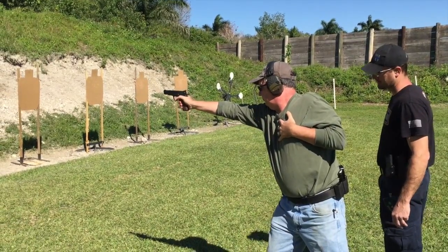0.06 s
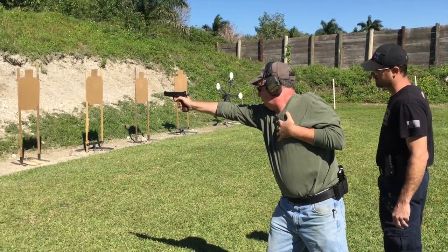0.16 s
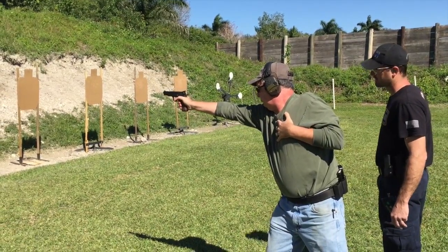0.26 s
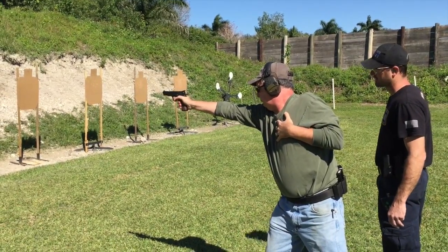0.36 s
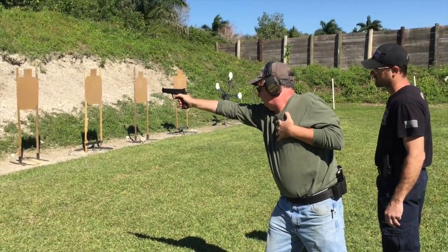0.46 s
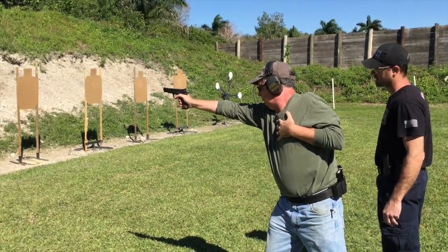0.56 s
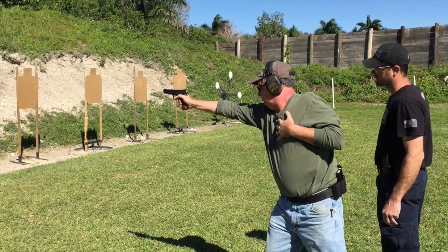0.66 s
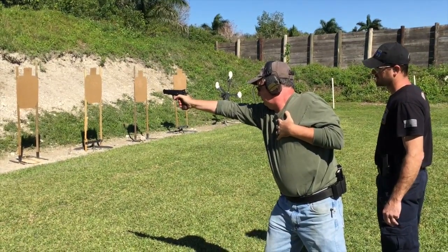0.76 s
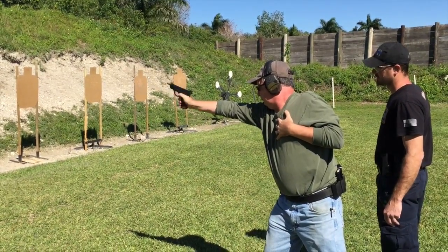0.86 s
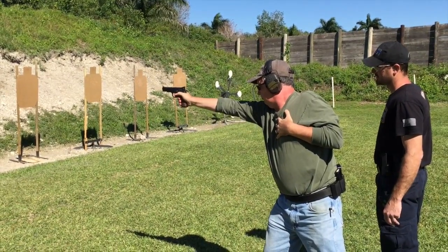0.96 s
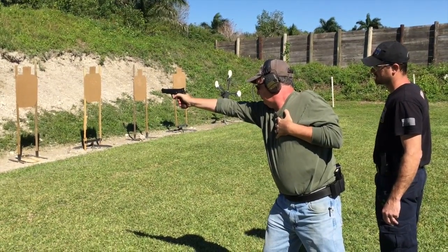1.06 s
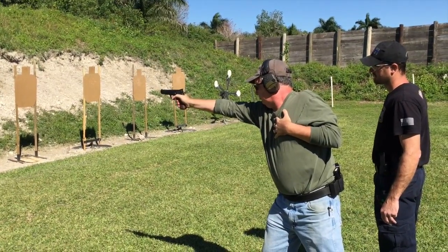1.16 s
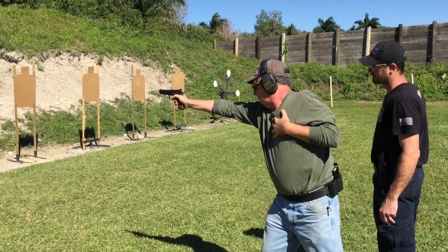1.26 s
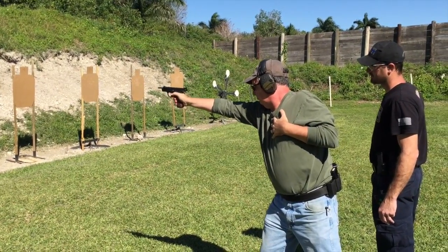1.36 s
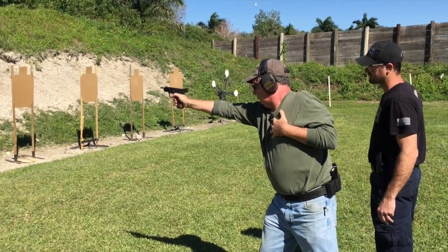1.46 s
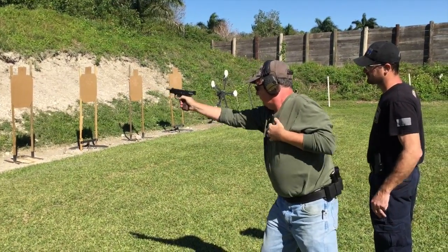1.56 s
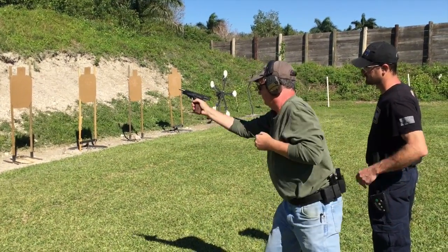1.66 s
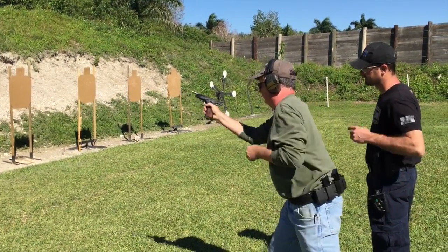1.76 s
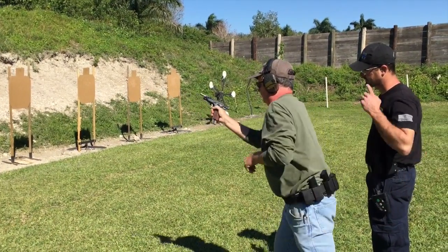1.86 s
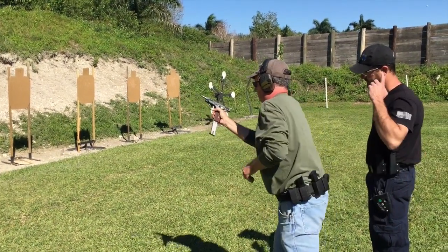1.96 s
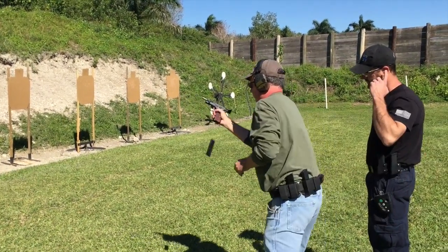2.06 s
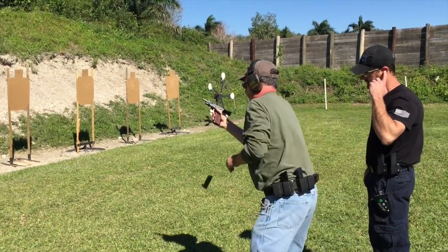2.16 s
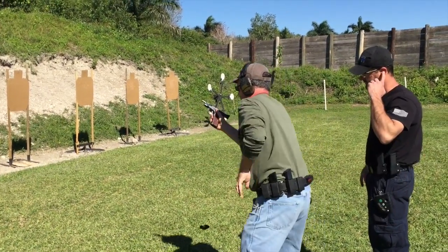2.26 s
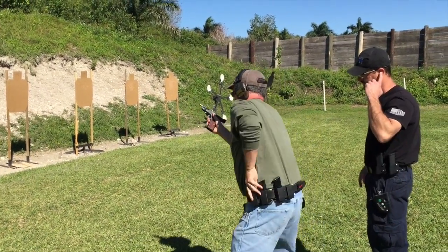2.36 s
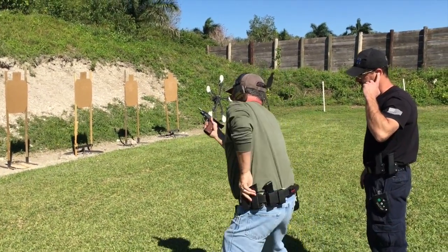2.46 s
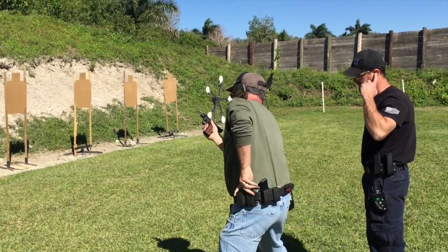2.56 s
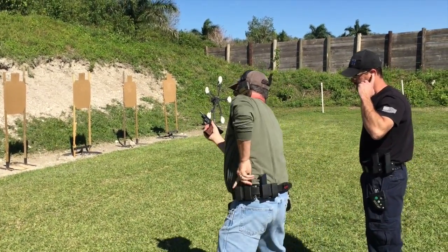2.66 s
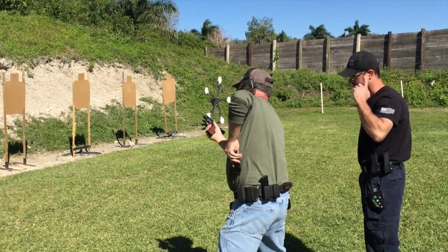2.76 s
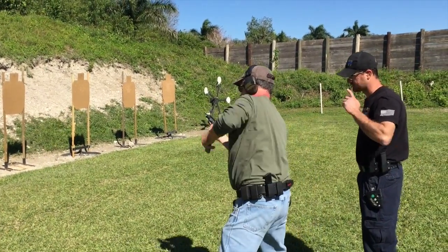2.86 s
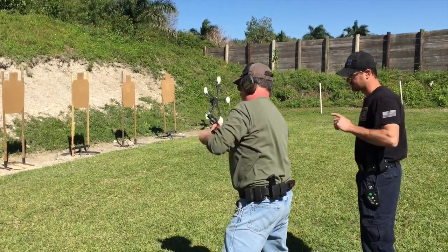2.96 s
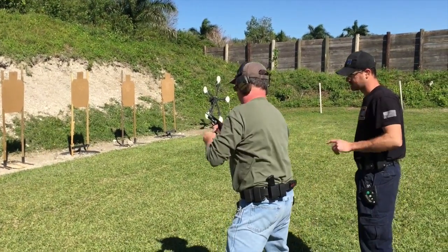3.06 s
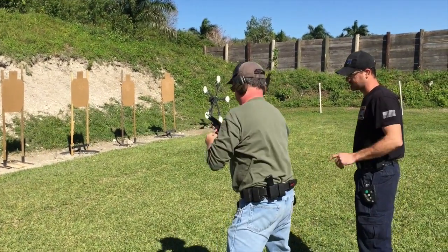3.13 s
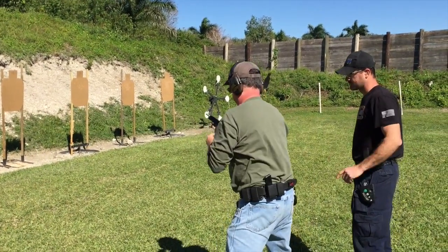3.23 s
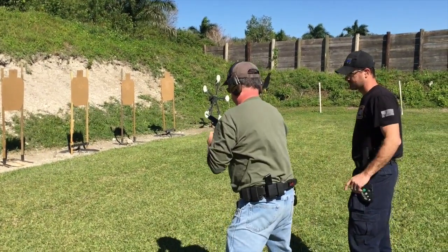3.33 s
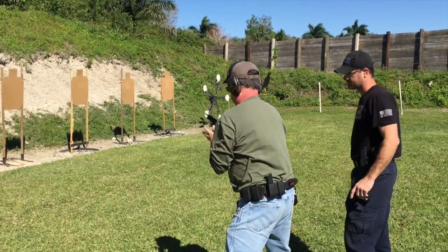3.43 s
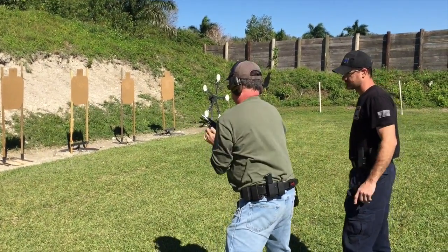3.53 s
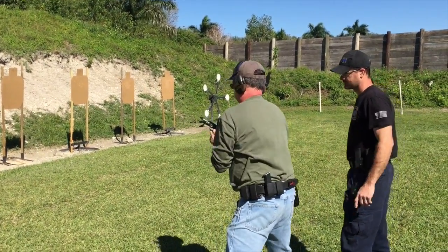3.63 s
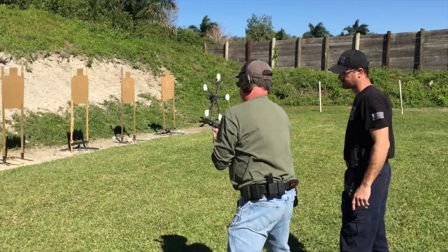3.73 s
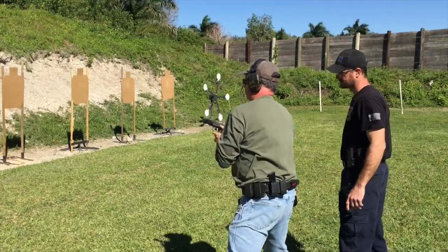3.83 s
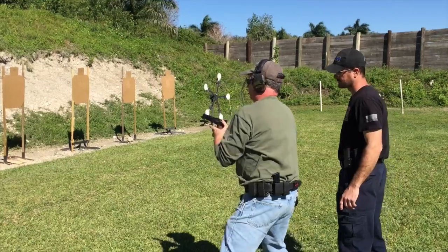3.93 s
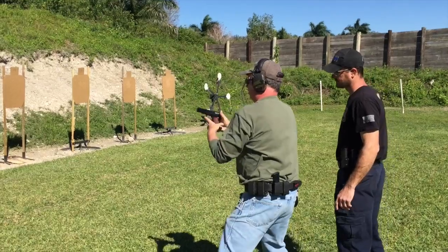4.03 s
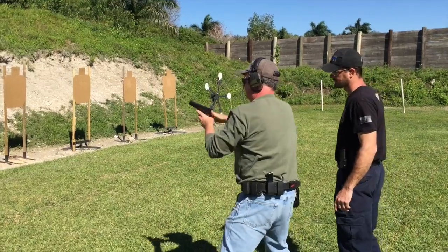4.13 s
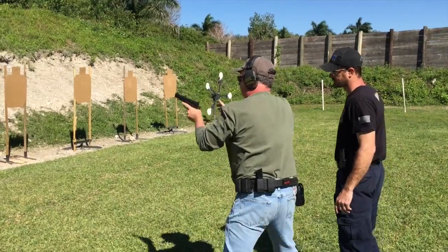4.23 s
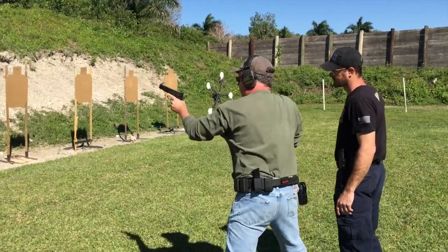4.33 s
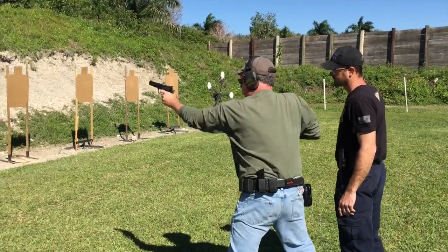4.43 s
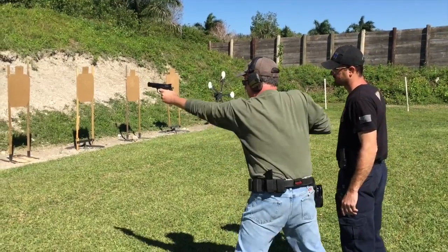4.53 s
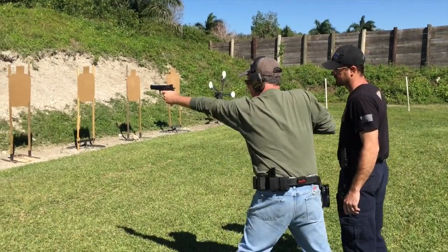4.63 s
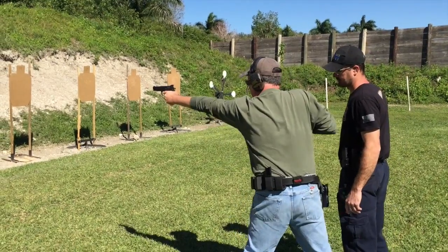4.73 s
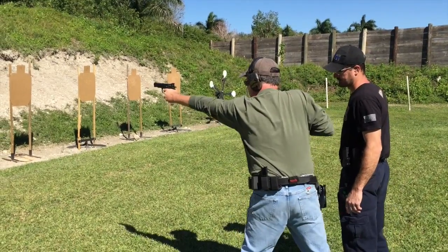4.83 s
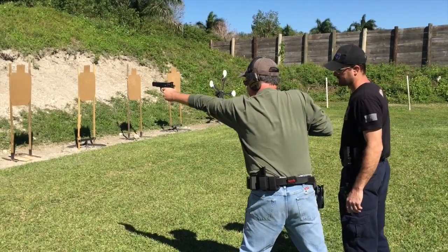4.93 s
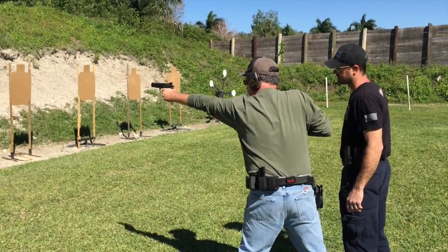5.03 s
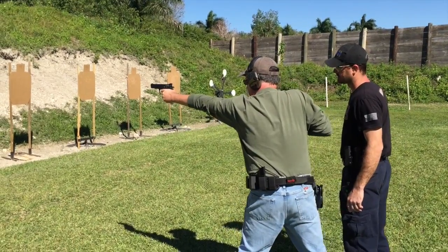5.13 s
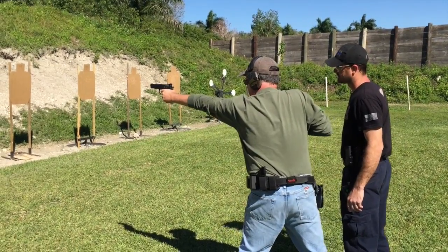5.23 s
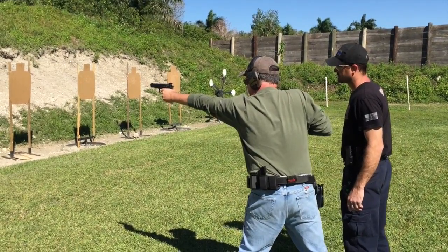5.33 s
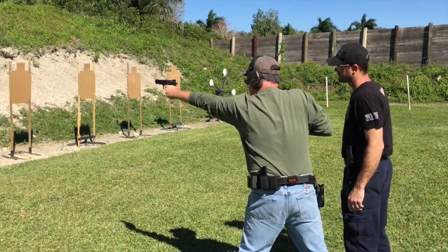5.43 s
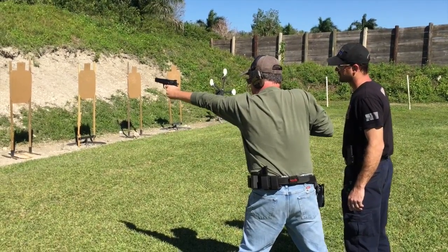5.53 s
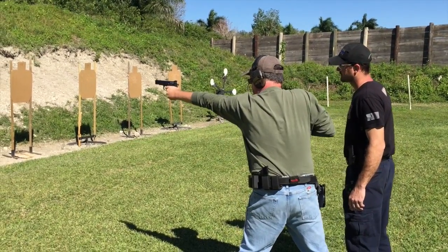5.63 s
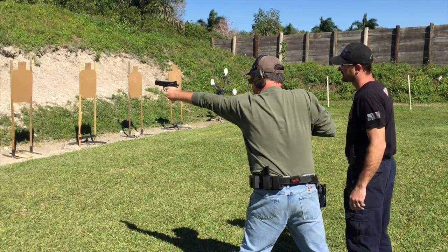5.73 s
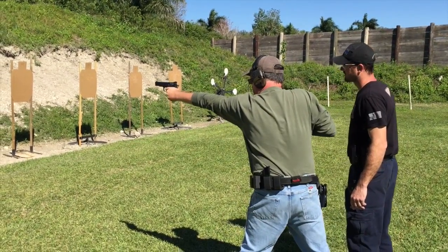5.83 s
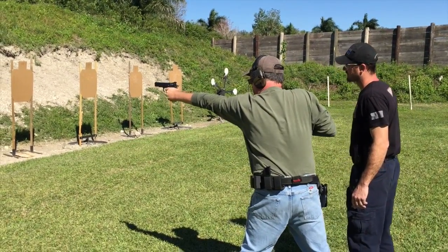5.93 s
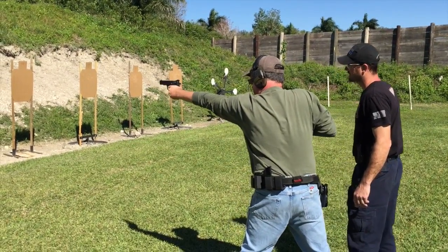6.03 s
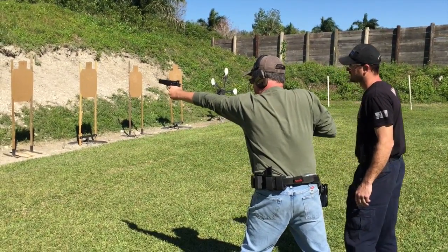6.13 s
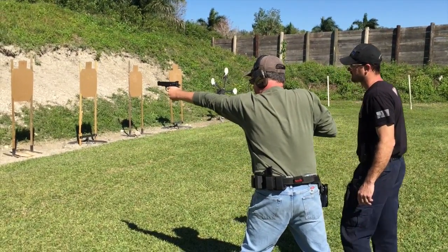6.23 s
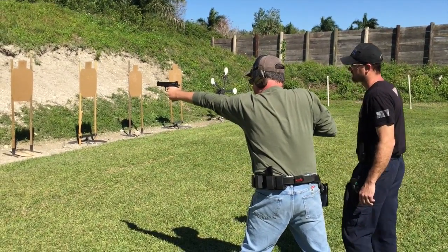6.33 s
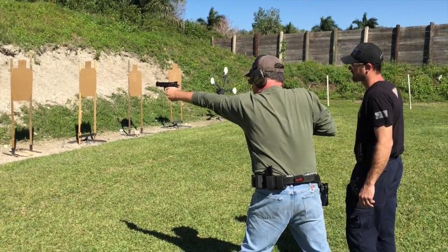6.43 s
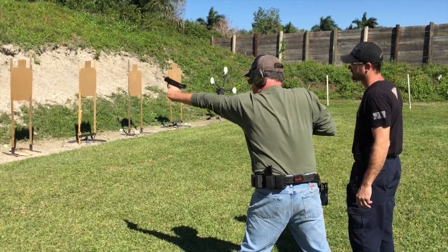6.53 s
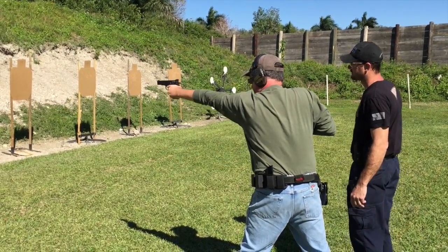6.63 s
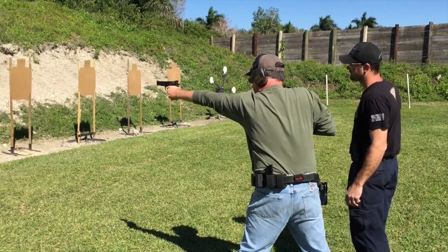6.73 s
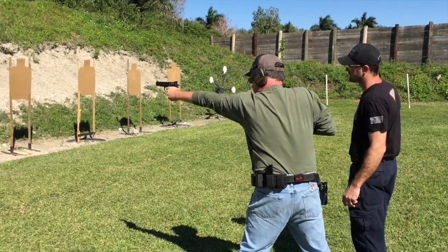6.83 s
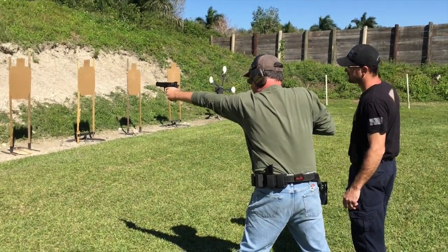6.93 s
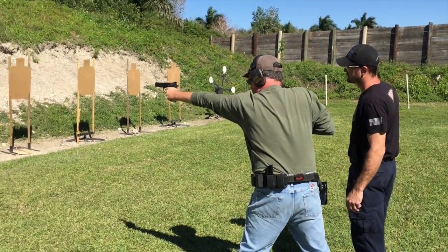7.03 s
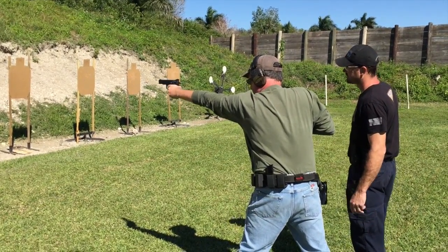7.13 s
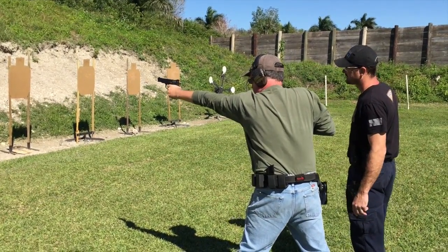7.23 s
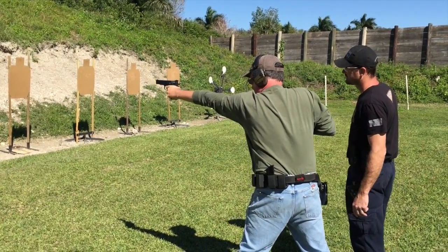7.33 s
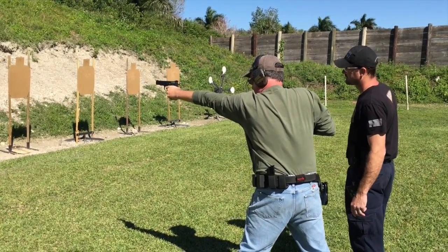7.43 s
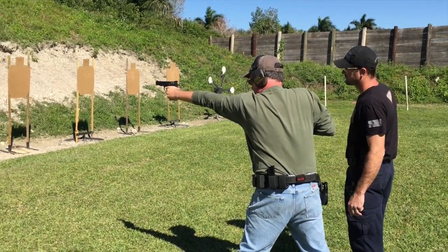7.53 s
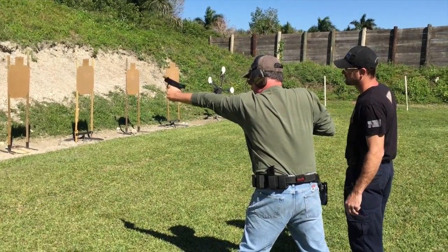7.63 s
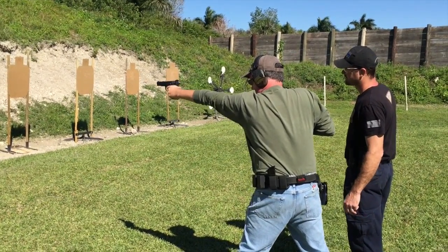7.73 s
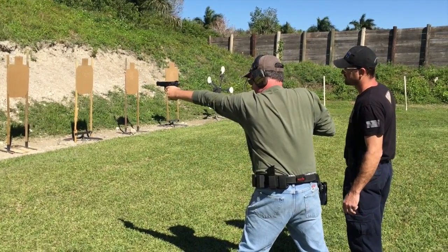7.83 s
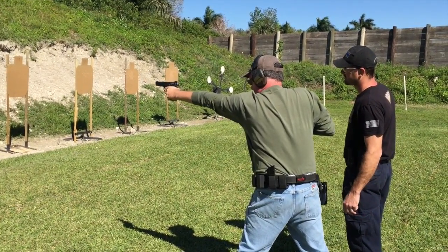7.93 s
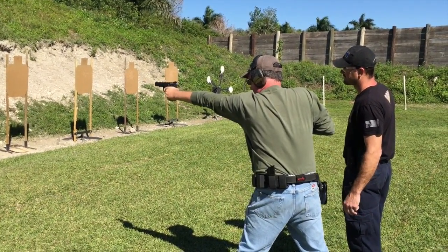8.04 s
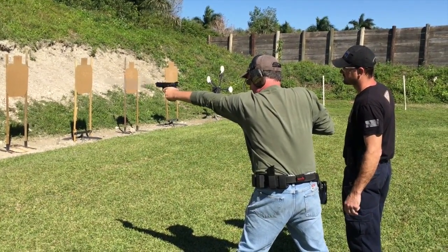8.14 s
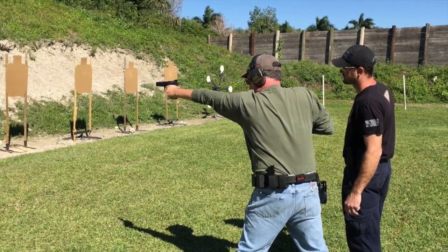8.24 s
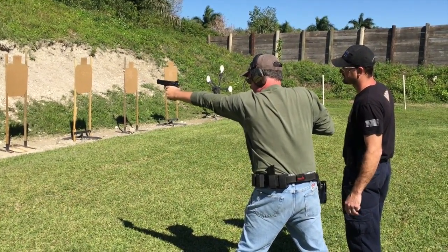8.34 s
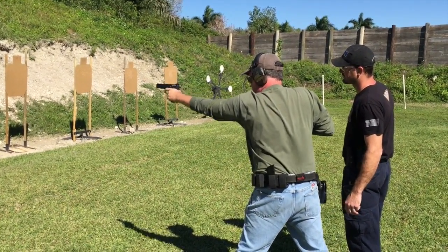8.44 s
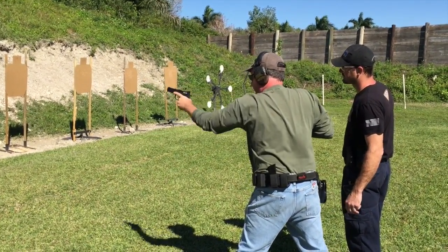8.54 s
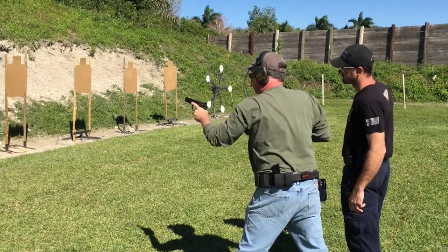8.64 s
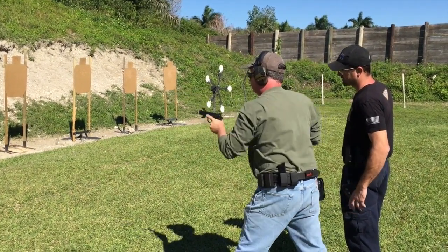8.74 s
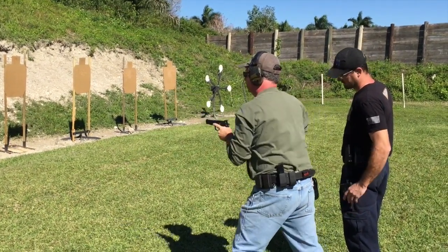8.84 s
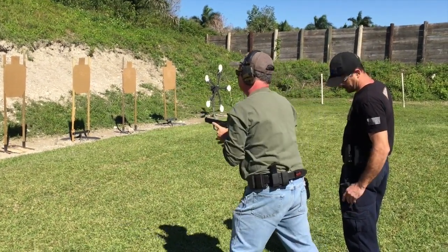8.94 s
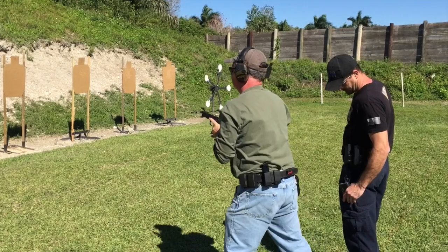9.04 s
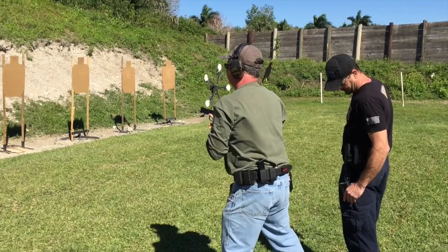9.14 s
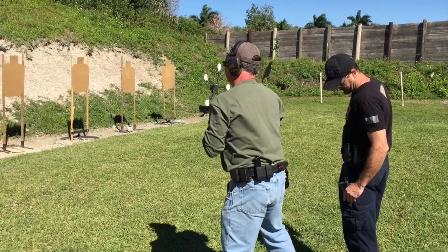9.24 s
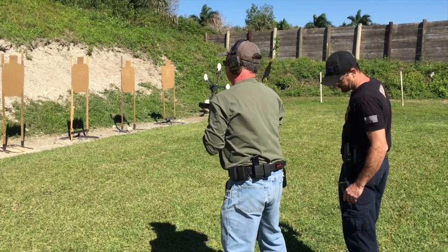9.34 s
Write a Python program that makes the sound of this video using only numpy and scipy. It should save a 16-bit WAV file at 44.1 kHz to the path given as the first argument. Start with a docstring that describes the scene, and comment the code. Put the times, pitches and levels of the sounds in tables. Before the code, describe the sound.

Four loud, overloaded handgun shots, a quick clattering magazine change and slide slam, then wind buffets and six more shots with rolling open-air echoes.

```python
"""Pistol practice on a grassy range

A pistol fires four shots, is reloaded, and fires six more outdoors. Each blast is noise and damped modes
that overload the microphone; an earth berm, a timber wall and the far country return it as noise and pulses.
Between the strings magazine and slide clack as struck resonators, clothes rustle as grainy noise,
a hand thumps softly, and wind buffets the microphone as low-passed turbulence."""
import sys
import numpy as np
from scipy import signal
from scipy.fft import rfft, irfft, next_fast_len
from scipy.io import wavfile

SR = 44100
rng = np.random.default_rng(int(sys.argv[2]) if len(sys.argv) > 2 else 0)


def materialize(psi):
    """Save the field psi as 16-bit PCM at rate SR to the path in sys.argv[1].

    A 1-D psi becomes a single channel; in a 2-D psi each row is a channel.
    """
    bounded = np.clip(np.atleast_2d(psi).T, -1, 1)
    quanta = np.round(bounded * 32767).astype(np.int16)
    wavfile.write(sys.argv[1], SR, quanta)


N = 414099
TIME = np.arange(N) / SR

# Noise spectrum of the muzzle crack, shared by the blast and its early returns:
# (frequency [Hz], relative density [dB per Hz])
CRACK_SPECTRUM = [(80, -15), (250, -0.5), (700, 2.5), (1500, 0.5), (2400, -6), (4000, -3.5), (7000, -8.5),
                  (10000, -13.5), (16000, -16.5)]


def from_db(db):
    """Level to amplitude: 20 dB is a factor of ten."""
    return 10 ** (np.asarray(db) / 20)


def noise(spectrum, size, tilt_db=0):
    """Spectral shaping: white noise filtered to a spectrum, scaled to an expected rms of 1 over its full length."""
    hz, db = np.transpose(spectrum)
    length = next_fast_len(max(size, 8192))
    octave = np.log2(np.maximum(np.arange(length // 2 + 1) * SR / length, 1))
    level_db = np.interp(octave, np.log2(hz), db)
    level_db = level_db + tilt_db * np.maximum(octave - 10, 0)  # tilt in dB per octave above 1024 Hz
    gain = from_db(level_db)
    gain *= 1 - np.exp(-(2 ** octave / 20) ** 2)  # fades out below about 20 Hz
    shaped = irfft(rfft(rng.standard_normal(length)) * gain, length)
    return shaped[:size] / np.sqrt(np.mean(gain ** 2))


def low_pass(x, hz, order=2):
    """Maximally flat (Butterworth) low-pass filtering."""
    return signal.sosfilt(signal.butter(order, min(hz, .45 * SR), fs=SR, output="sos"), x)


def resonate(x, hz, q):
    """Selective resonance: one peak filter, its output restored to the input energy."""
    y = signal.lfilter(*signal.iirpeak(min(hz, .45 * SR), max(q, 1), fs=SR), x)
    return y * np.linalg.norm(x) / np.linalg.norm(y)


def lumps(size, rate_hz, depth_db):
    """Random amplitude modulation: a slowly wandering gain of rms 1."""
    settle = SR // 4  # the filter's start is discarded
    slow = low_pass(rng.standard_normal(size + settle), rate_hz)[settle:]
    gain = from_db(depth_db * np.clip(slow / slow.std(), -2, 2))
    return gain / np.sqrt(np.mean(gain ** 2))


def burst(spectrum, t60, rise, tilt_db=0):
    """Reverberant decay: noise with an exponential rise [s] and a 60 dB fall in t60 [s]."""
    t = TIME[:int(2 * t60 * SR) + 1]
    return noise(spectrum, len(t), tilt_db) * (1 - np.exp(-t / rise)) * from_db(-60 * t / t60)


def ring(modes, spread_db):
    """Modal superposition: damped sines of alternating sign, their levels varied at random."""
    t = TIME[:SR // 3]
    out = np.zeros(len(t))
    for k, (hz, db, t60) in enumerate(modes):
        envelope = from_db(db + rng.normal(0, spread_db) - 60 * t / t60)
        out += (-1) ** k * envelope * np.sin(2 * np.pi * hz * t)
    return out


def pressure_pulse(hz):
    """Bipolar pulse: a Gaussian derivative of peak 1, its spectrum strongest at the given frequency."""
    phase = 2 * np.pi * hz * TIME[:SR // 10] - np.pi
    return -phase * np.exp((1 - phase ** 2) / 2)


def hump(t, s, half):
    """Gaussian envelope of height 1 centred on time s, down to 1/e after one half length."""
    return np.exp(-((t - s) / half) ** 2)


def swell(sound, s, half):
    """Amplitude windowing: a sound under a Gaussian hump, cut off three half lengths out."""
    out = np.zeros(N)
    near = slice(max(int((s - 3 * half) * SR), 0), int((s + 3 * half) * SR))
    out[near] = sound[near] * hump(TIME[near], s, half)
    return out


def add(out, s, sound):
    """Linear superposition: mix a sound in from time s [s]."""
    start = int(round(s * SR))
    out[start:start + len(sound)] += sound[:max(len(out) - start, 0)]


def open_air():
    """Ambient noise: a steady, mostly low and middle hush of the quiet open air."""
    # hush of the open air: (frequency [Hz], relative density [dB per Hz])
    air_spectrum = [(30, -14), (200, 2.5), (500, -2), (1700, -5.5), (3000, -12), (8000, -20), (16000, -22)]
    return from_db(-70.5) * noise(air_spectrum, N)


def wind_and_thump():
    """Turbulent pressure at the microphone: puffs reach higher in stronger wind; a hand thump is made alike."""
    # rumble of the wind: (frequency [Hz], relative density [dB per Hz])
    rumble_spectrum = [(20, -21.5), (40, -2.5), (70, 3), (150, -5), (260, -15), (500, -34), (1500, -62)]
    # gusts that swell and sink: (middle [s], half length [s], level [dB])
    gusts = [(2.45, 0.46, -56.5), (3.4, 0.3, -57), (4.35, 0.54, -51), (5.426, 0.29, -34.5),
             (5.85, .2, -37.5), (7.098, .9, -56.5), (9.049, 0.28, -54)]
    # single low puffs, wind buffets and at 3.706 s a hand thump:
    # (middle [s], half length [s], rms level over one half length [dB])
    puffs = [(3.706, 0.014, -42), (4.90, .012, -35.5), (5.111, .009, -31), (5.217, 0.013, -30),
             (5.268, 0.015, -29), (5.36, 0.021, -22), (5.431, 0.02, -24), (5.951, 0.005, -28.5),
             (9.29, 0.012, -37.5)]
    calm_db = -66  # level between gusts
    top_edge_hz, halving_db = 480, 16.5  # puff edge at the strongest wind; it halves per so many dB of lull

    gust_strengths = [from_db(db) * hump(TIME, s, half) for s, half, db in gusts]
    strength = np.hypot(np.linalg.norm(gust_strengths, axis=0), from_db(calm_db))
    out = noise(rumble_spectrum, N) * strength * lumps(N, rate_hz=14, depth_db=2.5)
    eddies = noise([(20, -18), (70, -3), (300, -8.0), (1500, -10.5)], N)
    for s, half, db in puffs:
        lull_db = 20 * np.log10(strength.max() / strength[int(s * SR)])
        edge_hz = top_edge_hz / 2 ** (lull_db / halving_db)
        puff = swell(low_pass(eddies, edge_hz, order=4), s, half)
        out += from_db(db) * puff * np.sqrt(half * SR / np.sum(puff ** 2))
    return out


def soft_swells():
    """Modulated, resonant noise: rubbing cloth and two far echoes as grainy pitched scuffs with a bright hiss."""
    # mid-pitched part of a swell: (frequency [Hz], relative density [dB per Hz])
    scuff_spectrum = [(200, 4), (700, 17), (1500, -5.5), (2100, 1.5), (3000, -21), (8000, -26)]
    # bright part of a swell: (frequency [Hz], relative density [dB per Hz])
    hiss_spectrum = [(500, -5), (2000, -0.5), (4500, 2.5), (6500, -2), (8000, -5.5), (10000, -5.5),
                     (16000, -8)]
    # soft mid-pitched swells: hands and clothes rubbing, and at 2.413 and 9.257 s the far echo of the
    # last shot: (middle [s], half length [s], relative scuff level [dB], hiss level [dB])
    swells = [(2.07, 0.02, -51.5, -55.5), (2.413, 0.052, -49, -58.5), (2.809, 0.046, -51, -69.5),
              (2.99, 0.048, -61, -74), (3.187, 0.045, -50, -71), (3.247, .028, -54.5, -55.5),
              (3.469, 0.015, -53.5, -58.5), (3.615, 0.071, -68, -58.5), (4.25, 0.094, -64, -69),
              (4.6, .08, -67, -69.5), (4.73, .035, -55, -61), (4.794, 0.026, -50.5, -57.5),
              (9.257, 0.13, -55.5, -78)]
    scuff_hz = 1580

    scuff = noise(scuff_spectrum, N) * lumps(N, rate_hz=110, depth_db=3.0)
    hiss = noise(hiss_spectrum, N) * lumps(N, rate_hz=78, depth_db=3.0)
    resonant = resonate(resonate(scuff, scuff_hz, q=2.2), scuff_hz, q=2.2)
    pitched = resonant + from_db(-7) * scuff
    out = np.zeros(N)
    for s, half, scuff_db, hiss_db in swells:
        out += swell(from_db(scuff_db - 0.5) * pitched + from_db(hiss_db) * hiss, s, half)
    return out


def field_echo(x, t60, echo_db):
    """Diffuse reverberation: noise follows the smoothed energy of a sound and dies away with it."""
    # returns of the open field: (frequency [Hz], relative density [dB per Hz])
    field_spectrum = [(200, -26.5), (700, -8.5), (1400, 2.5), (2600, -4), (4000, -10.5), (8000, -22.5),
                      (9700, -17), (16000, -33.5)]
    keep = from_db(-120 / (t60 * SR))  # energy kept per sample, a millionth after t60
    energy = signal.lfilter([1 - keep], [1, -keep], x ** 2 + 1e-18)
    wash = noise(field_spectrum, N) * lumps(N, rate_hz=35, depth_db=1.6)
    return from_db(echo_db) * np.sqrt(energy) * wash


def reload():
    """Impact excitation of modes: magazine drawn and seated, slide slammed home; the field answers softly."""
    # knock of steel on steel: (frequency [Hz], relative density [dB per Hz])
    steel_spectrum = [(150, -12.5), (500, -14), (1100, 5), (2000, 4.5), (3000, 3), (5000, 7.5), (6800, 5),
                      (7700, -4), (9600, 5), (13000, -1.5), (16000, -9)]
    # steel parts knocking: (time [s], relative level [dB], t60 [s], treble tilt [dB per octave],
    # pitch of the struck part [Hz])
    clacks = [(2.5198, -26.5, 0.042, 4, 4860), (2.5231, -12, .016, 6.5, 13400),
              (2.5384, -33, 0.053, 7, 5500), (2.761, -42, .024, -17, 1100),
              (2.8414, -35, 0.027, -9.5, 1490), (3.051, -56, .02, -5, 3500), (3.1217, -44, .05, -8, 1300),
              (3.13, -39, .024, 11, 2200), (3.1728, -38, .05, 7, 2040), (3.1894, -35.5, 0.045, -6, 1770),
              (3.468, -45, .04, -6, 1020), (3.5795, -20.5, .036, -0.5, 1820),
              (3.588, -38.5, 0.071, 1.5, 3110), (3.81, -31, .05, 2, 4925), (3.829, -25, .08, 1, 6780),
              (3.8387, -8, .046, 5.5, 9620), (3.8433, -19.5, .055, -6, 1250), (4.164, -55, 0.041, 3, 4470),
              (4.29, -47, .03, -4, 3970), (4.354, -50, 0.048, -4, 4240)]
    # ringing of slide and magazine: (frequency [Hz], relative level [dB], t60 [s])
    gun_modes = [(3250, -21, 0.13), (5060, -14, 0.033), (5980, -12.5, .035), (6700, -17.5, 0.068),
                 (8970, -11.5, 0.061), (9650, -22.5, 0.18), (10300, -21, .05), (12950, -12, .035),
                 (14660, -23.5, .04)]

    out = np.zeros(N)
    for s, db, t60, tilt_db, hz in clacks:
        knock = burst(steel_spectrum, t60, rise=0.00013, tilt_db=tilt_db)
        knock = knock * lumps(len(knock), rate_hz=620, depth_db=2.5)  # the parts chatter as they meet
        add(out, s, from_db(db - 2.5) * knock + from_db(db - 9) * resonate(knock, hz, q=17))
        ring_db = db - 7 + 1.5 * min(tilt_db, 1)  # dull knocks ring less
        add(out, s, from_db(ring_db) * ring(gun_modes, spread_db=3.0))
    return out + field_echo(out, t60=0.75, echo_db=-17.5)


def far_roll(air_loss_db=4.5):
    """Air absorption: lumpy far echoes lose treble, in dB per kHz and second of travel."""
    # echo of trees and banks: (frequency [Hz], relative density [dB per Hz])
    country_spectrum = [(60, -9), (200, 1.5), (400, -0.5), (650, 3.5), (1200, 2), (2400, -2), (4000, -5.5),
                        (8000, -14.5), (16000, -26.5)]
    # far banks and tree lines: (delay after the shot [s], relative level [dB], rise [s], t60 [s])
    far_banks = [(.098, -24, .045, 0.45), (.27, -33.5, 0.021, 0.38), (.33, -37.5, 0.031, 0.56),
                 (.56, -42.5, 0.18, 1.4), (.99, -46.5, .1, 1.4)]

    t = TIME[:2 * SR]
    hz, s, frames = signal.stft(noise(country_spectrum, len(t)), SR, nperseg=256)
    absorption = from_db(-air_loss_db * np.outer(hz / 1000, s))
    dulled = signal.istft(frames * absorption, SR)[1][:len(t)]
    body = low_pass(dulled, 1500, order=1)  # large banks return the mids in clumps, leaves the treble evenly
    clumps = lumps(len(t), rate_hz=70, depth_db=3)
    returns = []
    for delay, db, rise, t60 in far_banks:
        decay = from_db(-60 * (t - delay) / t60)
        returns.append(from_db(db) * np.where(t < delay, hump(t, delay, rise), decay))
    return (body * clumps + dulled - body) * np.linalg.norm(returns, axis=0)


def wall_slap():
    """Specular reflection: the timber wall returns a short rattle, a rounded pulse and a soft thud."""
    # rattle of the wall: (frequency [Hz], relative density [dB per Hz])
    wall_spectrum = [(60, -36), (250, 10), (700, 0.5), (1200, 0.5), (2400, 0.5), (4500, -16.5),
                     (10000, -19.5), (16000, -40)]
    out = from_db(-10.0) * burst(wall_spectrum, t60=0.022, rise=0.00057)
    add(out, .0002, from_db(-4.5) * pressure_pulse(hz=1380))
    add(out, .001, from_db(-18.5) * pressure_pulse(hz=350))
    return out


def terrain():
    """Reflection and scattering: the berm answers sharply, target stands and ground trail lumpily."""
    # answer of the berm: (frequency [Hz], relative density [dB per Hz])
    berm_spectrum = [(35, -24.5), (85, -8), (190, -10.5), (260, 2), (400, -11.5), (570, 8), (720, -8.5),
                     (1100, 1), (1600, -4), (2100, -14), (3100, -9), (4800, -19.5), (6300, -19),
                     (16000, -34)]
    # scatter from stands and ground: (frequency [Hz], relative density [dB per Hz])
    scatter_spectrum = [(60, -3.5), (200, -4), (400, -11), (570, 6), (730, -0.5), (1100, 4.5), (1600, -1.5),
                        (2100, -10.5), (3100, -1), (4800, -12), (6200, -6), (8000, -15.5), (9500, -16),
                        (16000, -25.5)]

    out = np.zeros(SR // 3)
    add(out, 0, from_db(10.5) * pressure_pulse(hz=2260))
    bright = resonate(burst(CRACK_SPECTRUM, t60=0.018, rise=.0002), 1650, q=2.0)
    add(out, 0, from_db(13) * bright)  # the upper mids come back first
    add(out, .0005, from_db(13.5) * burst(berm_spectrum, t60=0.034, rise=0.00087))
    scatter = burst(scatter_spectrum, t60=0.1, rise=0.0041)
    add(out, .012, from_db(2.0) * scatter * lumps(len(scatter), rate_hz=540, depth_db=3.5))
    return out


def blast(length=.0105):
    """Impulsive jet noise: muzzle gas roars and collapses; its pressure rings at the microphone."""
    # pressure ringing: (frequency [Hz], relative level [dB], t60 before the collapse shortens it [s])
    blast_modes = [(142, -13, 0.096), (285, -3, 0.072), (395, -1.5, 0.028), (586.7, -0.5, 0.099),
                   (957, -5.5, 0.13)]
    crack = burst(CRACK_SPECTRUM, t60=0.065, rise=0.00023)
    tones = ring(blast_modes, spread_db=1.5)[:len(crack)]
    collapse = np.exp(-(TIME[:len(crack)] / length) ** 3)
    return (from_db(14.5) * tones + from_db(15.0) * crack) * collapse


def pistol(sameness=.6):
    """Multipath propagation: muzzle blast, then grass and berm, the wall and the far roll."""
    # shots: (time [s], relative level [dB], relative level of the low thump [dB])
    shots = [(.0055, -1.5, -1), (0.5167, -1.5, 4), (0.971, -1, -4), (1.427, -1, -5.5), (5.491, 5, 13.5),
             (6.0957, -2.5, -8.5), (6.647, -1, -0.5), (7.1995, -1, 7), (7.7536, -1, 3.5),
             (8.2772, -1.5, -1.5)]
    # two answers of the wall: delays after the shot [s]
    wall_delays = (.1105, .1203)
    berm_delay = .0302  # s
    berm_db, wall_db = -1, 1.5  # near echoes, relative to their shot

    out, fixed_paths = np.zeros(N), terrain()
    share = np.clip(sameness, 0, 1)  # the terrain stays put, only the muzzle moves a little
    for s, db, thump_db in shots:
        add(out, s, from_db(db) * blast())
        sizzle = burst(CRACK_SPECTRUM, t60=0.13, rise=0.0027)  # off the grass
        add(out, s + 0.0073, from_db(db - 2.5) * sizzle)
        thump_gain = from_db(thump_db - 11.5)
        add(out, s + 0.0076, thump_gain * pressure_pulse(hz=59))  # the bass swings through late
        echo = np.sqrt(share) * fixed_paths + np.sqrt(1 - share) * terrain()
        add(out, s + berm_delay, from_db(db + berm_db) * echo)
        add(out, s + berm_delay + 0.0033, thump_gain * pressure_pulse(hz=61))
        add(out, s + wall_delays[0], from_db(db + wall_db - 7.5) * wall_slap())
        add(out, s + wall_delays[1], from_db(db + wall_db) * wall_slap())
        add(out, s, far_roll())  # equally strong after every shot
    return out


def scene():
    """Superposition of the quiet open air, the wind and the shooter, as one channel."""
    return (open_air() + wind_and_thump() + soft_swells() + reload() + pistol())[None]


def record(dry, overload_db=6.0, ceiling_db=-6.5, release_db_per_s=16.0):
    """Saturation and gain control: the microphone overloads, the level ducks at once and recovers slowly."""
    top = from_db(overload_db)
    clipped = dry / (1 + (dry / top) ** 4) ** (1 / 4)
    excess_db = np.maximum(20 * np.log10(np.abs(clipped) + 1e-9) - ceiling_db, 0)
    recovery_db = release_db_per_s * TIME
    duck_db = np.maximum.accumulate(excess_db + recovery_db, axis=-1) - recovery_db
    ducked = clipped * from_db(-duck_db)
    # deep bass and top are cut
    thinned = signal.sosfilt(signal.butter(2, 35, "high", fs=SR, output="sos"), ducked)
    return signal.sosfilt(signal.ellip(10, .1, 80, 15900, fs=SR, output="sos"), thinned)


dry = scene()
out = record(dry)
materialize(out)
```